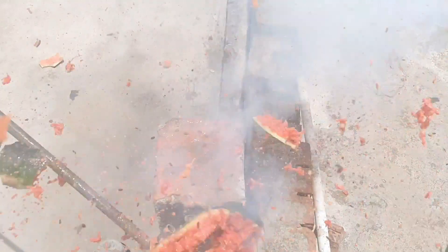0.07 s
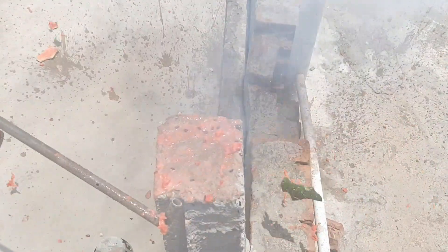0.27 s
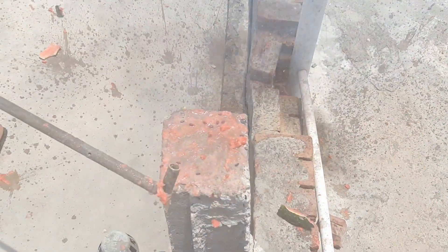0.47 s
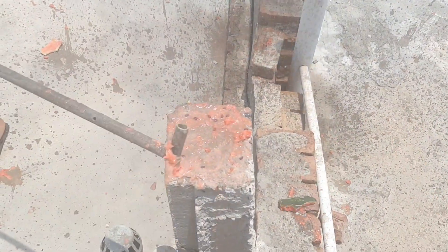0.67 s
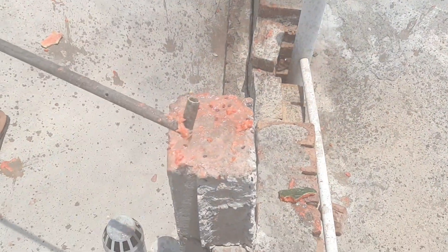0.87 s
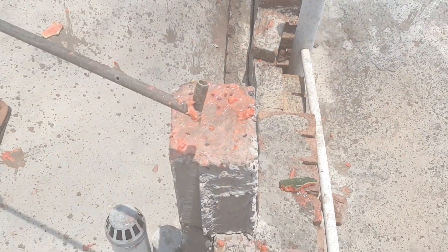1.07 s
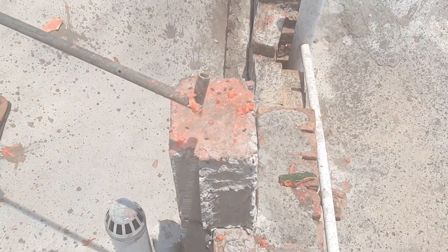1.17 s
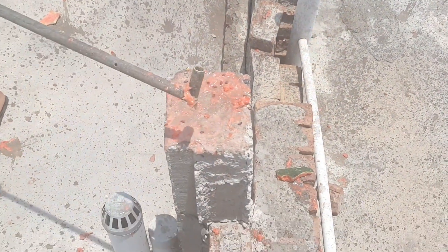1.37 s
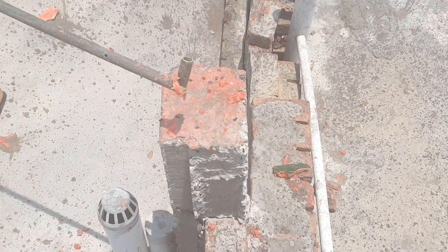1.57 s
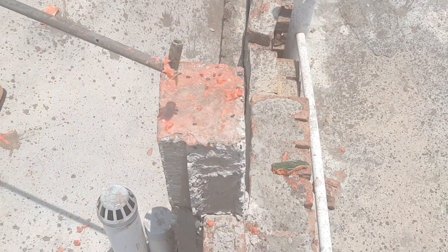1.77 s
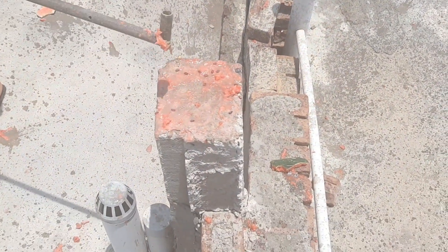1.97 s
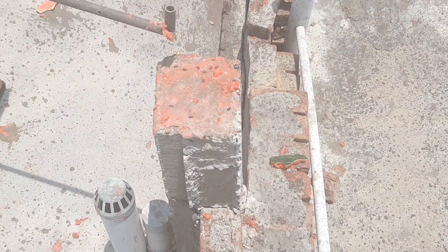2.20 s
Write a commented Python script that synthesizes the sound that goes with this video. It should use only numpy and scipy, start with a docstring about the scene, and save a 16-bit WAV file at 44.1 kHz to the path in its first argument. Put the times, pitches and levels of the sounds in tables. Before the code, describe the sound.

A sharp, loud gun blast hits at 0 s, with rapid wall slaps and two hard rind cracks within 0.05 s. Dense reverberation fades over about 0.4 s into a dull low roll. Fine spray and wet splats patter until about 1 s, strongest near 0.17 and 0.56, with a low knock at 0.68. Sparse faint ticks follow over quiet hush, slight wind bumps near 1.45, 1.8 and 2.15, and barely audible squeaks around 2 s.

```python
"""A pipe gun goes off into a melon in a walled concrete yard: blast pulses, a dense near tail, a long dull roll.
A faint hush of filtered noise lies under it; rind knocks as decaying tones with a crack, spray patters
as coloured clicks, and wet pieces splat as ringing noise bursts. Later come gusts of low narrow-band noise
and two faint squeaks of pure tone. The gain control holds after the loud sounds, then lifts what is left."""
import sys
import numpy as np
from scipy import signal
from scipy.io import wavfile
from scipy.ndimage import uniform_filter1d

SR = 44100
rng = np.random.default_rng(int(sys.argv[2]) if len(sys.argv) > 2 else 0)


def pcm_store(signal):
    """Save signal as 16-bit PCM."""
    levels = np.round(np.clip(np.atleast_2d(signal), -1, 1) * 32767)
    wavfile.write(sys.argv[1], SR, levels.astype(np.int16).T)


N = 98563

# left-right likeness of yard tails and spray: pitch_hz, likeness (1 = same at both ports)
LIKENESS = [(60, 1), (250, .93), (600, .75), (1500, 0.1), (6000, 0.18), (15000, .55)]
LAG_S, FAR_LAG_S = 3.85e-4, 5e-5  # how late the left port hears
PAN_DB = -2.5  # left port relative to right
RISE_MS = 1.4  # attack of splats and knocks


def amp(db):
    """Turns decibels into a linear gain."""
    return 10 ** (np.asarray(db) / 20)


def evened(x):
    """Scales a sound to an RMS of one."""
    return x / np.sqrt(np.mean(x ** 2) + 1e-20)


def topped(x):
    """Scales each sound to a peak of one."""
    return x / (abs(x).max(-1, keepdims=True) + 1e-20)


def read(points, hz):
    """Reads a curve over frequency, interpolating on a log axis."""
    f, value = np.transpose(points)
    return np.interp(np.log(hz + 1), np.log(f + 1), value)


def level(points):
    """Gain along a (s, dB) curve, practically silent outside it."""
    s, db = np.transpose(points)
    return amp(np.interp(np.arange(N) / SR, s, db, left=-140, right=-140))


def add(mix, s, sound):
    """Lays a sound into the mix at a time, cut off at the end."""
    part = mix[..., max(round(s * SR), 0):][..., :sound.shape[-1]]
    part += sound[..., :part.shape[-1]]


def resonate(x, hz, width_hz):
    """Two-pole resonance: a wider band rings for less time."""
    r = np.exp(-np.pi * width_hz / SR)
    turn = 2 * np.pi * min(hz, .45 * SR) / SR
    return signal.lfilter([1 - r], [1, -2 * r * np.cos(turn), r * r], x)


def ports(x, pan_db, lag_s=LAG_S):
    """One sound at both microphone ports, left late by the lag (early if negative)."""
    left = np.roll(x, round(lag_s * SR))
    return np.array([left, x]) * amp([[pan_db / 2], [-pan_db / 2]])


def shaped(pair, spectrum, same, t60=None, lag_s=LAG_S, patchy_db=0, size=512):
    """Colours two sources, mixes them by likeness, scatters patches of level and lets each band die away."""
    overlap = size * 3 // 4
    hz, t, z = signal.stft(pair, SR, nperseg=size, noverlap=overlap)
    likeness = np.clip(read(same, hz), -1, 1)[:, None]
    left = likeness * z[0] + np.sqrt(1 - likeness ** 2) * z[1]
    left = left * np.exp(-2j * np.pi * hz * lag_s)[:, None]
    z = np.array([left * amp(PAN_DB), z[0]]) * amp(read(spectrum, hz))[:, None]

    # louder and softer patches, smoothed over frequency and then time
    patches = uniform_filter1d(rng.standard_normal(z.shape[1:]), size=12, axis=0)
    patches = uniform_filter1d(patches, size=7, axis=1)
    z = z * amp(patchy_db * evened(patches))

    # the RMS before any decay sets the level
    steady = np.sqrt(np.mean(signal.istft(z, SR, nperseg=size, noverlap=overlap)[1] ** 2))
    if t60:
        z = z * amp(-60 * t / read(t60, hz)[:, None])
    return signal.istft(z, SR, nperseg=size, noverlap=overlap)[1][:, :N] / steady


def clicks(per_s, spread_db):
    """Random clicks of either sign and uneven loudness, independent in two channels."""
    strength = amp(spread_db * np.minimum(rng.exponential(1, (2, N)), 4))
    struck = rng.random((2, N)) < per_s / SR
    return strength * struck * rng.choice([-1, 1], (2, N))


def bang():
    """Blast pulses off the nearest walls, inside a dense near tail and a long dull roll."""
    # strongest echoes: time_s, peak_pressure (signed)
    echoes = [(.0006, .4), (.0034, -.5), (.0052, .35), (.0101, .35), (.0154, -.5), (.0163, .4),
              (.0223, -.4), (.0234, .55)]
    # yard reverberation: pitch_hz, relative_level_db_per_hz; then pitch_hz, t60_s
    near_spectrum = [(30, -29), (86, -9), (153, -16), (287, -5.5), (473, -8), (721, -11.5), (1320, -26.5),
                     (1540, -20), (6210, -32), (9220, -40.5), (16000, -35.5)]
    near_t60 = [(60, 0.08), (250, 0.45), (700, 0.41), (2000, 0.35), (6000, .27), (15000, 0.33)]
    # roll from far buildings: pitch_hz, relative_level_db_per_hz; then pitch_hz, t60_s
    far_spectrum = [(30, -20.5), (80, -5.5), (245, 4.5), (540, -0.5), (1310, -27.5), (3000, -36.5),
                    (3900, -48.5), (6600, -120)]
    far_t60 = [(60, 3.2), (250, 1.77), (800, 2), (3000, 3.9)]
    near_db, far_db = -9.5, -31  # RMS before decay
    near_lag_s, pulse_ms = -3e-4, .45

    pulses = np.zeros(N)
    u = np.arange(400) / SR / (pulse_ms / 1000)
    blast = 2 * u * (2 - u) * np.exp(-u)  # push, then suction
    for s, peak in echoes:
        add(pulses, s - pulse_ms / 2000 - near_lag_s / 2, peak * blast)

    near = shaped(clicks(6000, 2.6), near_spectrum, LIKENESS, near_t60, near_lag_s)
    noise = rng.standard_normal((2, N))
    far = shaped(noise, far_spectrum, LIKENESS, far_t60, FAR_LAG_S, size=1024)
    return ports(pulses, PAN_DB, near_lag_s) + amp(near_db) * near + amp(far_db) * far


def hush():
    """Steady hush of the neighbourhood: coloured noise with a slightly patchy level."""
    # colour of the hush: pitch_hz, relative_level_db_per_hz
    hush_spectrum = [(30, -12), (103, -3), (280, -9), (616, -13), (1070, -19), (1500, -20.5), (4300, -27),
                     (5700, -32.5), (7500, -23), (9750, -40), (11000, -32.5), (16000, -33)]
    # left-right likeness of the hush: pitch_hz, likeness
    hush_likeness = [(60, 0.69), (240, 0.99), (950, 0.53), (3770, 0)]
    hush_db = -62.5  # RMS
    noise = rng.standard_normal((2, N))
    return amp(hush_db) * shaped(noise, hush_spectrum, hush_likeness, patchy_db=2.2, size=1024)


def knocks():
    """Rind on concrete: a decaying tone with a short crack of band-limited noise."""
    # knocks: start_s, tone_level_db, pitch_hz, t60_s, crack_db (crack against tone)
    thuds = [(0.0212, -7, 1667, 0.013, 6), (.0455, -10.5, 2216, 0.013, 0), (0.6338, -43, 685, 0.017, 15),
             (0.6833, -29, 345, 0.025, 6), (1.081, -49.5, 1100, 0.012, 7.5),
             (1.824, -42, 2140, 0.0077, -16)]
    crack_hz, crack_width_hz, crack_ms = 1900, 2600, 1.8
    out, t = np.zeros((2, N)), np.arange(2600) / SR
    rise = np.minimum(t * 1000 / RISE_MS, 1)
    for s, db, hz, t60, crack_db in thuds:
        noise = rng.standard_normal(len(t))
        band = resonate(resonate(noise, crack_hz, crack_width_hz), crack_hz, crack_width_hz)
        crack = topped(np.exp(-t * 1000 / crack_ms) * band)
        knock = np.sin(2 * np.pi * hz * t) + amp(crack_db) * crack
        add(out, s, ports(rise * amp(db - 60 * t / t60) * knock, PAN_DB, FAR_LAG_S))
    return out


def spray():
    """Fine spray falling: a rain of tiny coloured clicks that swells and thins."""
    # loudness of the spray: time_s, level_db
    patter = [(.06, -40), (.165, -51), (.175, -37.5), (.27, -45), (.335, -41.5), (.48, -45.5), (.545, -45),
              (.565, -37.5), (.625, -44.5), (.655, -48), (.76, -53.5), (.787, -40), (.82, -46),
              (.84, -55.5), (.96, -54.5), (.985, -62), (1.15, -72.5)]
    # colour of the spray: pitch_hz, relative_level_db_per_hz
    spray_spectrum = [(290, -14), (500, -2), (1510, -9.5), (2850, -12), (4530, -12.5), (8830, -19.5),
                      (11800, -17.5), (16000, -17.5)]
    drops_per_s, drop_spread_db = 12000, 5.5
    drops = clicks(drops_per_s, drop_spread_db)
    return level(patter) * shaped(drops, spray_spectrum, LIKENESS, patchy_db=2.5, size=256)


def splats():
    """Wet pieces landing: short noise bursts through a broad ring, with a bright fizz."""
    # pieces landing: start_s, ring_peak_db, ring_hz, fizz_db (fizz against ring)
    landings = [(0.0925, -34, 12500, 5.5), (0.171, -25.5, 5500, -1), (0.1954, -44, 12200, 7),
                (0.2495, -34, 5900, 10), (0.3287, -32.5, 4500, 0), (0.3574, -32.5, 4950, 0),
                (0.3921, -46, 5100, 14), (0.506, -29.5, 6930, -24), (0.5628, -23, 4880, -5.5),
                (0.579, -31, 6600, -10), (0.7005, -45, 10400, 0), (0.7375, -52, 11900, 10),
                (0.7627, -43.5, 5450, -18), (0.7846, -33, 5800, -1.5), (0.8065, -43, 4940, 15.5),
                (0.859, -40.5, 4450, 3.5), (0.899, -47, 6100, -8), (0.9432, -45.5, 4870, -8),
                (1.0942, -55, 11100, -8), (1.345, -58.5, 12140, -7), (1.38, -54.5, 12600, -18),
                (1.441, -60, 7650, -5), (1.4566, -55.5, 10900, -4), (1.674, -72, 7270, 19.5),
                (1.8227, -58.5, 11600, 12.5), (2.0652, -60.5, 11100, 14.5), (2.071, -64, 13100, 16),
                (2.157, -61.5, 12800, -14)]
    ring_q, fall_ms, pan_db = 2.52, 1.54, -8.5
    scatter = .5  # share that reaches each port off nearby surfaces
    out, t = np.zeros((2, N)), np.arange(2600) / SR
    shape = np.minimum(t * 1000 / RISE_MS, 1) * np.exp(-t * 1000 / fall_ms)
    for s, db, hz, fizz_db in landings:
        noise = shape * rng.standard_normal((3, len(t)))  # direct, scattered left, scattered right
        ring = topped(resonate(resonate(noise, hz, hz / ring_q), hz, hz / ring_q))
        fizz = topped(np.diff(noise, prepend=0) + 2.1 * noise)
        direct, *scattered = amp(db) * (ring + amp(fizz_db) * fizz)
        add(out, s, ports(direct, pan_db) + scatter * np.array(scattered))
    return out


def wind():
    """Lumpy wind at each port: low narrow-band noise, partly shared and louder on the left."""
    # gusts: time_s, level_db
    gusts = [(1.4, -96), (1.45, -53), (1.5, -73.5), (1.76, -67.5), (1.795, -49.5), (1.83, -51), (1.86, -61),
             (2.0, -64), (2.16, -54), (2.23, -66.5)]
    gust_hz, gust_width_hz = 103, 49
    noise = rng.standard_normal((2, N))
    a, b = resonate(resonate(noise, gust_hz, gust_width_hz), gust_hz, 3 * gust_width_hz)
    return level(gusts) * evened(np.array([1.5 * a, 0.48 * a + 0.61 * b]))


def squeaks():
    """Faint squeaks: steady pure tones that swell and fade as half a sine."""
    # squeaks: start_s, peak_db, pitch_hz, length_s
    pips = [(1.972, -73, 4700, .026), (2.036, -65, 1310, .022)]
    out, t = np.zeros((2, N)), np.arange(2600) / SR
    for s, db, hz, length in pips:
        swell = np.sin(np.pi * np.minimum(t / length, 1))
        add(out, s, ports(amp(db) * swell * np.sin(2 * np.pi * hz * t), PAN_DB, FAR_LAG_S))
    return out


def scene():
    """The bang, the hush under it, what falls afterwards, the wind and the squeaks."""
    return bang() + hush() + knocks() + spray() + splats() + wind() + squeaks()


def record(dry):
    """Drops the deepest bass, holds the gain after the last loud moment, raises it, rounds peaks, cuts the top."""
    mic_low_hz, edge_hz = 41.7, 15850
    loud_db, hold_s, recover_db_per_s = -26.5, 1.34, 13  # gain control
    ceiling = .92

    dry = signal.sosfilt(signal.butter(2, mic_low_hz, "high", fs=SR, output="sos"), dry)
    power_db = 10 * np.log10(abs(uniform_filter1d((dry ** 2).mean(0), 800)) + 1e-12)
    t = np.arange(N) / SR
    since_loud_s = t - np.maximum.accumulate(t * (power_db > loud_db))
    gain = amp(recover_db_per_s * np.maximum(since_loud_s - hold_s, 0))
    rounded = ceiling * np.tanh(dry * gain / ceiling)
    lowpass = signal.firwin(511, edge_hz, window=("kaiser", 9), fs=SR)
    return signal.oaconvolve(rounded, lowpass[None], "same")


dry = scene()
out = record(dry)
pcm_store(out)
```